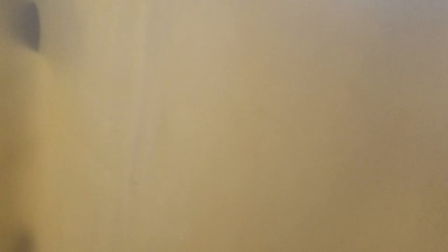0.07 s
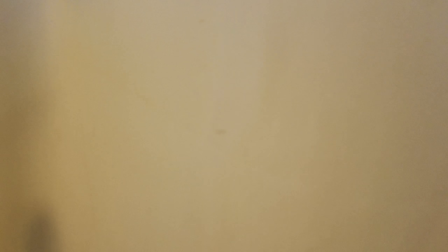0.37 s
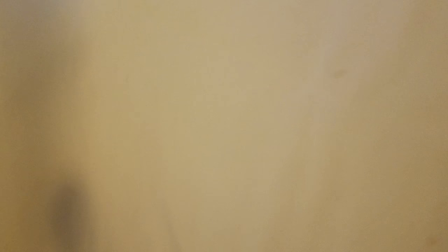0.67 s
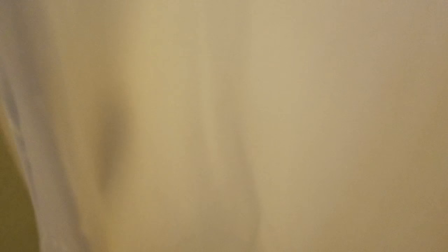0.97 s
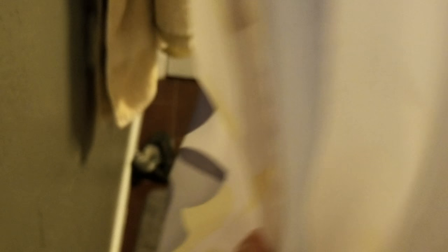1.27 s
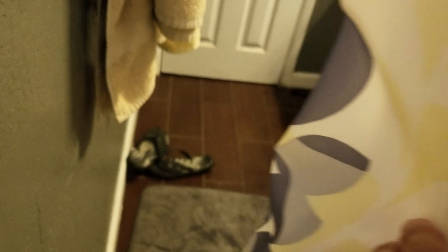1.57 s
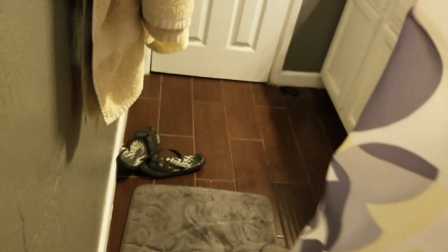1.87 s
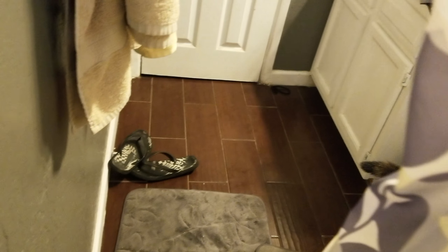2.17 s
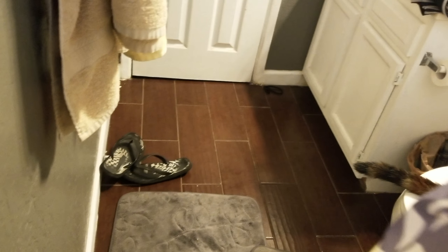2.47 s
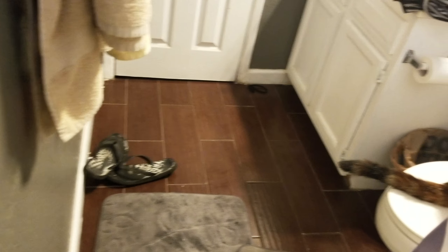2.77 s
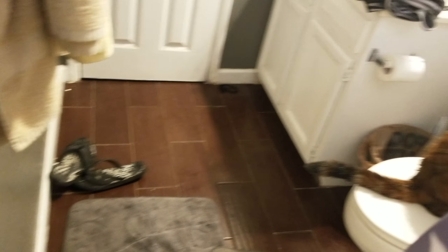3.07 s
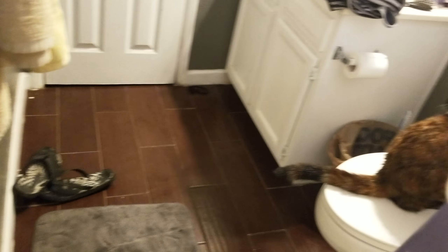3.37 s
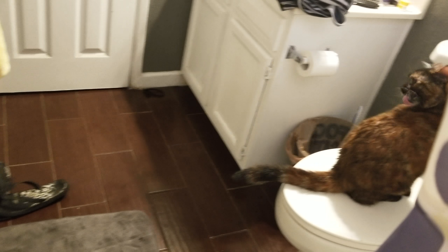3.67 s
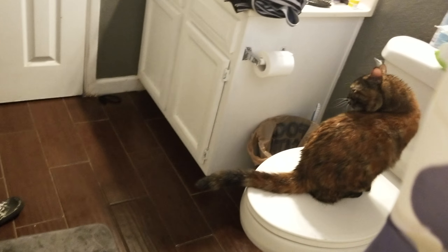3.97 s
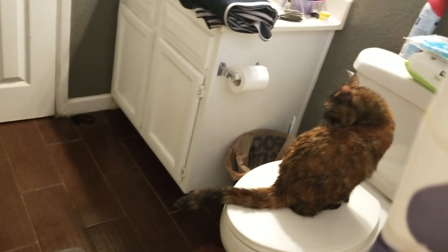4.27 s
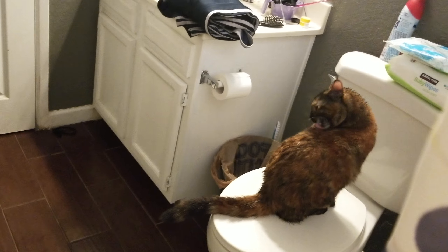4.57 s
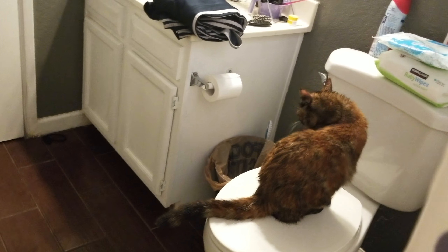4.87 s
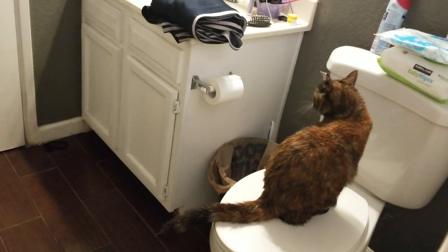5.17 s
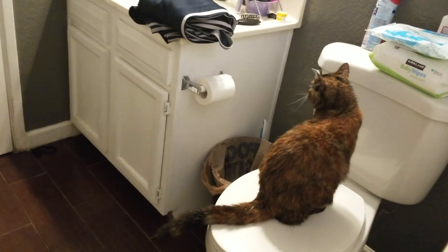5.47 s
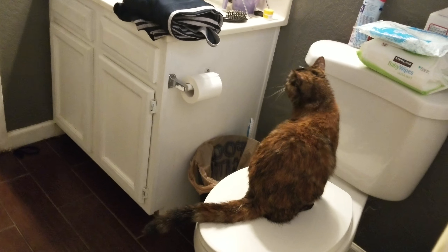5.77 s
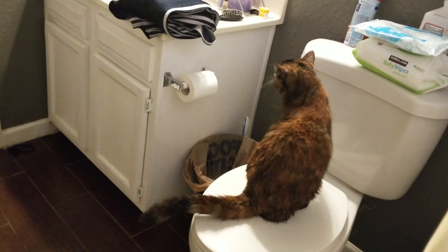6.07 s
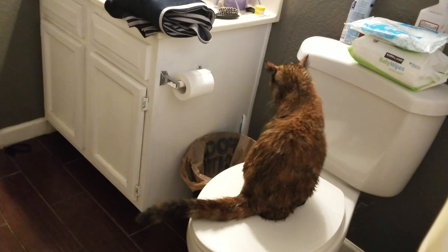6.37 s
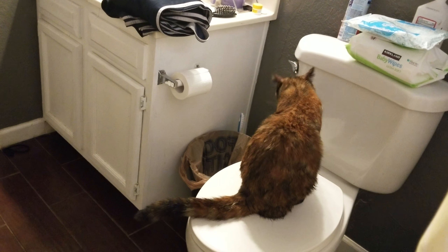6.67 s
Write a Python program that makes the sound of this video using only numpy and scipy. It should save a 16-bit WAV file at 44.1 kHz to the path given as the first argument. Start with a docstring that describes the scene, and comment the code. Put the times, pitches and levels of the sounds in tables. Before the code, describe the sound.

Steady shower spray splashes into a tub with small drips and a low fan hum, slowly turning hollower.

```python
"""A shower runs in a small tiled bathroom, heard from beside the curtain.
The spray drums on the ringing tub, patters in the puddle, splashes and fizzes off the walls.
Drips plink as their trapped bubbles ring, close drops tick and clots of water splat.
An exhaust fan hums underneath, and everything swells and sinks slowly as one.
The water grows duller and hollower as the listener turns away from it."""
import sys
import numpy as np
from scipy import signal
from scipy.fft import rfft, irfft, next_fast_len
from scipy.io import wavfile
from scipy.ndimage import map_coordinates

SR = 44100
rng = np.random.default_rng(int(sys.argv[2]) if len(sys.argv) > 2 else 0)


def store_wav(level_fs):
    """Save 16-bit WAV to argv[1]."""
    pcm = np.round(np.clip(np.atleast_2d(level_fs), -1, 1) * 32767)
    wavfile.write(sys.argv[1], SR, pcm.T.astype(np.int16))


N = 300762
START_S = 0.069  # silence before the sound opens

# The bright colour of bursting drops. Each row: frequency in Hz, level in dB.
FIZZ_SPECTRUM = [(2500, -48), (4200, -16.5), (5600, -11.5), (7300, -10), (9000, -5.5), (10300, 0),
                 (11400, 3), (13000, 2.5), (14500, 2.5), (15700, 0.5)]


def amp(db):
    """Decibels to gain."""
    return 10 ** (np.asarray(db) / 20)


def unit(x):
    """Scale to rms 1."""
    return x / np.sqrt(np.mean(x ** 2) + 1e-20)


def along(points, hz):
    """Read (Hz, value) points on a log frequency axis."""
    freqs, values = np.transpose(points)
    return np.interp(np.log(hz + 1), np.log(freqs + 1), values)


def curve(points):
    """Join (seconds, value) points into one value per sample."""
    return np.interp(np.arange(N) / SR, *np.transpose(points))


def wobble(rate):
    """A smooth random curve with rate knots a second."""
    knots = rng.standard_normal(int(N * rate / SR) + 4)
    return map_coordinates(knots, [np.arange(N) * rate / SR])


def filtered(x, response):
    """Filter x by a gain that is a function of frequency."""
    n = x.shape[-1]
    padded = next_fast_len(n + 8192)
    return irfft(rfft(x, padded) * response(np.fft.rfftfreq(padded, 1 / SR)), padded)[..., :n]


def coloured(x, spectrum):
    """Shape x with (Hz, dB) points and scale it to rms 1."""
    return unit(filtered(x, lambda hz: amp(along(spectrum, hz))))


def add(track, start_s, sound):
    """Mix a stereo sound into the track."""
    part = track[:, int(start_s * SR):][:, :sound.shape[1]]
    part += sound[:, :part.shape[1]]


def diffuse(pair):
    """Long waves reach both sides alike, short ones do not."""
    # Each row: frequency in Hz, left-right likeness from 0 to 1.
    likeness = [(50, 0.92), (160, 0.9), (270, 0.97), (450, 0.65), (740, 0.56), (1220, 0), (2000, 0)]
    angle = lambda hz: np.arccos(along(likeness, hz)) / 2
    mid, side = filtered(pair, lambda hz: np.array([np.cos(angle(hz)), np.sin(angle(hz))]))
    return np.array([mid + side, mid - side])


def in_room(x, wet_db, t60):
    """Tiled walls smear every drop into a dying wash that follows the energy of the sound."""
    decay = amp(-60 / (t60 * SR)) ** 2
    energy = signal.lfilter([1 - decay], [1, -decay], np.mean(x ** 2, axis=0))
    return x + amp(wet_db) * np.sqrt(energy) * rng.standard_normal(x.shape)


def near_walls(x, echo_db, count):
    """Close tiles return weak echoes within 20 ms, different ones to each side."""
    echoes = np.zeros((2, SR // 50))
    for side in echoes:
        side[rng.integers(SR // 500, len(side), count)] = amp(echo_db) * rng.choice([-1, 1], count)
    return x + signal.oaconvolve(x, echoes, axes=1)[:, :N]


def impacts(count, spread_db):
    """Drops of all sizes land at random, each reaching the two sides with its own lag and strength."""
    when, where = rng.random((count, 2)).T
    size = amp(spread_db * np.clip(rng.standard_normal(count), -3, 2.5))
    lag = (where - .5) * SR * .0008
    arrivals = [np.clip(when * N + side * lag, 0, N - 1).astype(int) for side in (-1, 1)]
    return unit(np.array([np.bincount(at, size * rng.standard_normal(count), N) for at in arrivals]))


def tub(x):
    """The tub and the air in it ring at their own resonances."""
    # Each row: centre in Hz, width in Hz, boost or cut in dB.
    modes = [(206.5, 9.1, 11.5), (285.6, 8.3, 6.5), (329, 15, 4), (383, 36, 3.5), (485.4, 10, 10),
             (660, 88, 0.5), (865, 21, 1.5), (937, 20, -2.5), (1970, 52, 2)]
    lift_db = lambda hz: sum(db / (1 + (2 * (hz - centre) / width) ** 2) for centre, width, db in modes)
    return filtered(x, lambda hz: amp(lift_db(hz)))


def drumming(level_db):
    """Countless blows merge into the low ringing of the tub."""
    # The tub's boomy body. Each row: frequency in Hz, level in dB.
    body = [(94, -24), (160, 1.5), (205, -3), (248, -2), (361, -4), (421, -7), (489, -8), (600, -13.5),
            (780, -39), (1320, -120)]
    blows = tub(diffuse(impacts(count=40000, spread_db=2)))
    return amp(level_db) * coloured(blows, body)


def bubbles(count, centre_hz, cycles, spread_db, rise):
    """Trapped bubbles ring for a few cycles and glide upward."""
    starts = (rng.random(count) * N).astype(int)
    pitch, size, left, right = np.clip(rng.standard_normal((count, 4)), -1.8, 1.8).T[:, :, None]
    t = np.arange(SR // 60) / SR
    turns = centre_hz * np.exp(.3 * pitch) * t
    age = turns / cycles
    envelope = amp(spread_db * size) * np.exp(-age) * (1 - np.exp(-8 * age))
    ring = envelope * np.sin(2 * np.pi * turns * (1 + rise * age))
    at = (starts[:, None] + np.arange(len(t))).ravel()
    return unit(np.array([np.bincount(at, (ring * side).ravel(), N)[:N] for side in (left, right)]))


def patter():
    """Drops plop into the puddle and trap bubbles, and the tub rings along."""
    # The puddle's midrange colour. Each row: frequency in Hz, level in dB.
    puddle = [(320, -44), (550, -4), (731, -2.5), (901, -8), (994, -5.5), (1280, -9), (2200, -8),
              (2860, -28), (4840, -120)]
    plops = in_room(impacts(count=30000, spread_db=5), wet_db=1.5, t60=0.8)
    plops += amp(-13) * bubbles(count=2400, centre_hz=1499, cycles=5.2, spread_db=2.5, rise=0.019)
    return coloured(tub(diffuse(plops)), puddle)


def splash():
    """Sharp hits and small bubbles make a splash that turns hollower as the listener turns."""
    # The splash's two colours. Each row: frequency in Hz, level in dB.
    bright = [(1400, -26), (2200, -4), (2800, -1), (3600, -3), (4300, -3.5), (5500, -5), (8000, -31)]
    hollow = [(1200, -11), (1800, -0.5), (2150, -7.5), (2600, -14.5), (4300, -25), (7000, -44)]
    # Each row: time in seconds, share of the hollow colour from 0 to 1.
    hollowness = [(2.0, 0.26), (2.7, 0.3), (3.3, 0.21), (5.2, 0.46), (6.8, 0.78)]
    plinks = in_room(impacts(count=20000, spread_db=2), wet_db=4, t60=0.04)
    plinks += amp(-7) * bubbles(count=2400, centre_hz=2800, cycles=7, spread_db=3.3, rise=.02)
    share = curve(hollowness)
    return unit((1 - share) * coloured(plinks, bright) + share * coloured(plinks, hollow))


def fizz():
    """A fine mist of drops blurs into a high sizzle."""
    mist = in_room(impacts(count=20000, spread_db=5), wet_db=3, t60=.12)
    return coloured(mist, FIZZ_SPECTRUM)


def spray(patter_db, splash_db, fizz_db):
    """The jets flutter, so patter, splash and fizz flicker a little together."""
    flutter = wobble(20)
    low, mid, high = patter(), splash(), fizz()
    low *= amp(patter_db + 0.46 * flutter)
    mid *= amp(splash_db + 0.5 * flutter + 1.03 * wobble(14))
    high *= amp(fizz_db + 1.05 * flutter)
    return near_walls(low + mid + high, echo_db=-17, count=10)


def fan(level_db, hum_hz=117.4):
    """The motor hums on a steady pitch with a wavering level; air rumbles in the duct."""
    # The motor's partials. Each row: multiple of the hum pitch, level in dB.
    partials = [(0.5, -16), (1, 0), (2, -28), (3, -29.5)]
    # The duct's rumble. Each row: frequency in Hz, level in dB.
    duct = [(18, -36), (28, -17), (40, -6.5), (54, -0.5), (75, -9), (95, -16), (130, -4), (200, -32.5)]
    phase = 2 * np.pi * hum_hz * np.arange(N) / SR
    hum = unit(sum(amp(db) * np.sin(k * phase + 2 * np.pi * rng.random()) for k, db in partials))
    air = coloured(diffuse(rng.standard_normal((2, N))), duct)
    waver = amp(-0.02 + 0.23 * wobble(15))
    return amp(level_db) * (waver * hum + amp(-12.5) * air)


def drips(gain_db=6.5, attack_s=0.0014, t60=0.03, rise_per_s=1.9):
    """A drip traps one bubble in the puddle, which rings briefly and glides upward."""
    # Each row: start in seconds, relative level in dB, starting pitch in Hz.
    plinks = [(0.074, -35, 2710), (0.416, -40, 2440), (0.486, -40, 3820), (0.94, -37, 4200),
              (1.469, -36, 2230), (1.533, -35.5, 3260), (1.777, -38.5, 1764), (3.225, -41, 2930),
              (3.45, -39, 2190), (5.264, -38, 920), (6.299, -36, 1970)]
    track, t = np.zeros((2, N)), np.arange(SR // 10) / SR
    for start, db, hz in plinks:
        turns = hz * t * (1 + rise_per_s * t / 2) + rng.random((2, 1)) / 4
        envelope = amp(db + gain_db - 60 * t / t60) * (1 - np.exp(-t / attack_s))
        add(track, start, envelope * np.sin(2 * np.pi * turns))
    return near_walls(track, echo_db=-15, count=10)


def ticks(gain_db=2, attack_s=0.0004, t60=0.022):
    """A close drop bursts in a bright snap of noise, a little louder on one side."""
    # Each row: start in seconds, relative peak in dB.
    close_drops = [(0.2433, -15), (0.3461, -11), (0.7632, -15.5), (0.8275, -14), (1.0647, -12.5),
                   (1.1917, -15), (1.8654, -20), (3.9564, -22), (4.6628, -21), (6.2397, -19), (6.4188, -23),
                   (6.584, -19), (6.745, -20)]
    track, t = np.zeros((2, N)), np.arange(SR // 8) / SR
    for start, db in close_drops:
        pan_db = rng.uniform(-1.5, 1.5) * np.array([[1], [-1]])
        envelope = amp(pan_db - 60 * t / t60) * (1 - np.exp(-t / attack_s))
        burst = envelope * rng.standard_normal((2, len(t)))
        tick = coloured(in_room(burst, wet_db=0, t60=.14), FIZZ_SPECTRUM)
        add(track, start, amp(db + gain_db) * tick / np.abs(tick).max())
    return track


def splats(droplets_per_s=4000, attack_s=0.00064, room_t60=0.49):
    """A clot of water breaks into droplets that splash in one band; a low one knocks on the tub."""
    # Each row: start in seconds, level in dB, centre in Hz, width in octaves, 60 dB decay in seconds.
    clots = [(0.992, -34.5, 2270, 0.26, 0.065), (1.192, -33, 8040, .25, 0.11),
             (1.232, -39.5, 3330, 0.49, 0.45), (1.484, -33, 5460, .39, .04), (1.835, -36, 9500, .29, 0.11),
             (2.724, -40, 2330, 0.18, 0.18), (4.661, -35, 6250, .6, .18), (4.747, -40, 2240, 0.38, 0.16),
             (5.47, -34, 557, .4, .04), (5.98, -43, 2050, 0.18, .13), (6.345, -41, 1800, .25, .12),
             (6.375, -42.5, 3570, .22, 0.091), (6.513, -37, 1750, 0.37, .2), (6.746, -36, 7800, .35, .07),
             (6.75, -42, 1600, .4, .2)]
    track, t = np.zeros((2, N)), np.arange(SR // 2) / SR
    attack = 1 - np.exp(-t / attack_s)
    for start, db, centre, octaves, t60 in clots:
        band = lambda hz: np.exp(-.5 * (np.log2((hz + 1) / centre) / octaves) ** 2)
        droplets = rng.standard_normal((2, len(t))) * (rng.random(len(t)) < droplets_per_s / SR)
        decay = amp(-60 * t / t60) + amp(-12.5 - 60 * t / room_t60)  # the splat, then the walls
        add(track, start, amp(db) * attack * decay * unit(filtered(droplets, band)))
    return track


def scene():
    """Running water and fan fade in and share one swell; turning away from the spray dulls the water."""
    # The slow swell. Each row: time in seconds, base level in dB.
    swell = [(0.33, -26), (0.72, -25.5), (0.92, -26), (1.5, -25.5), (1.7, -30), (1.98, -32.5), (2.7, -32),
             (2.9, -29.5), (3.55, -30.5), (4.03, -31.3), (4.28, -28), (4.7, -27.5), (5.05, -28.5),
             (5.45, -28.5), (6.08, -30), (6.33, -26), (6.8, -25.0)]
    # The listener's turn. Each row: time in seconds, 0 for facing the spray up to 1 for turned away.
    turning = [(0.15, 0.077), (0.55, 0.46), (0.95, 0.099), (1.5, 0.42), (1.8, 0.28), (2.6, 0.5),
               (2.87, 0.26), (3.5, 0.59), (4.3, 0.52), (5.4, 1), (6.0, 0.94), (6.3, 0.74), (6.8, 0.81)]
    swell_db, away = curve(swell), curve(turning)
    fade_depth = np.exp(-np.maximum(np.arange(N) / SR - START_S, 0) / 0.065)
    water_db = swell_db - 3 * fade_depth
    shower = drumming(water_db - 13.3 - 1.8 * away)
    shower += spray(patter_db=water_db - 20.13 + 2.5 * away,
                    splash_db=water_db - 17 - 6 * away ** 2,  # longer waves bend round the curtain
                    fizz_db=water_db - 1 - 9 * away)
    shower += ticks() + drips() + splats()
    return shower + fan(swell_db - 11 * fade_depth)


def record(dry, top_hz=15900):
    """Each microphone port colours its side; the sound opens after a moment and stops at top_hz."""
    # The stereo tilt. Each row: frequency in Hz, left minus right in dB.
    balance = [(120, 1.64), (450, -0.0), (1100, -1.5), (1700, -7), (2600, -2.5), (3700, 1.2), (4400, 5),
               (5300, 4.7), (6600, 3), (7800, 11.5), (9400, 3), (11000, -3.5), (13000, 3), (15300, 4)]

    def ports(hz):
        gain = amp(along(balance, hz) * np.array([[.5], [-.5]]))
        return gain / np.sqrt(np.mean(gain ** 2, axis=0))

    opening = np.clip((np.arange(N) / SR - START_S) / .002, 0, 1)
    return filtered(filtered(dry, ports) * opening, lambda hz: hz < top_hz)


dry = scene()
out = record(dry)
store_wav(out)
```